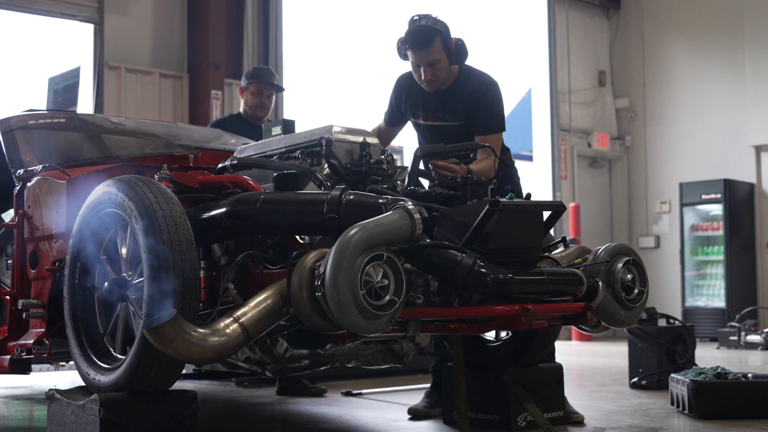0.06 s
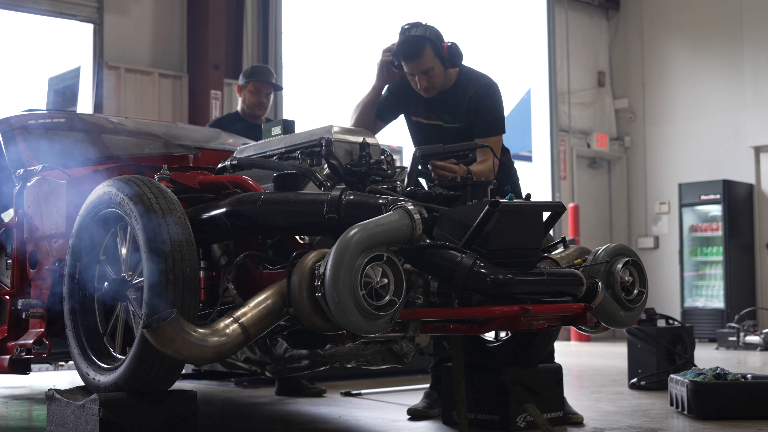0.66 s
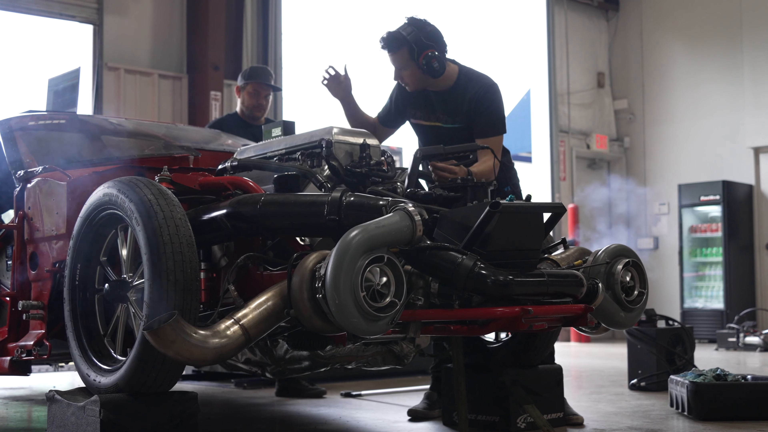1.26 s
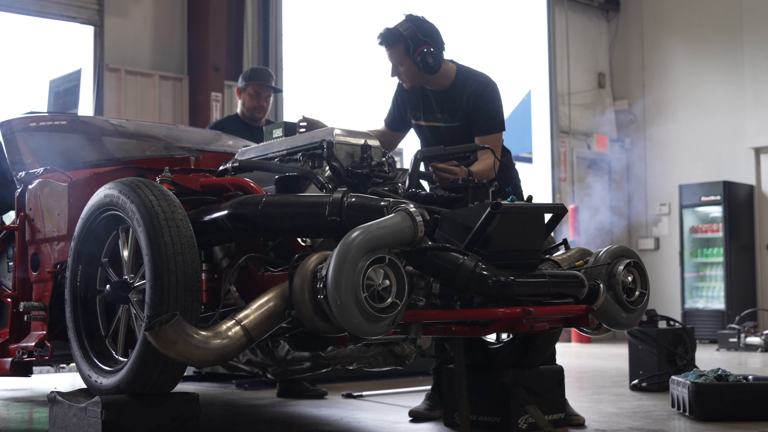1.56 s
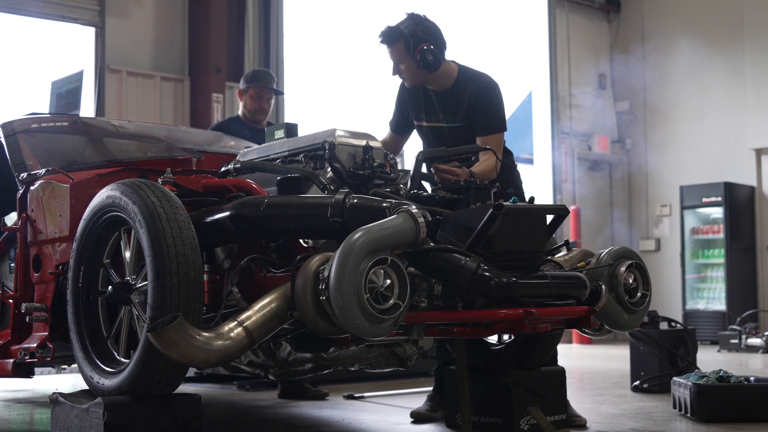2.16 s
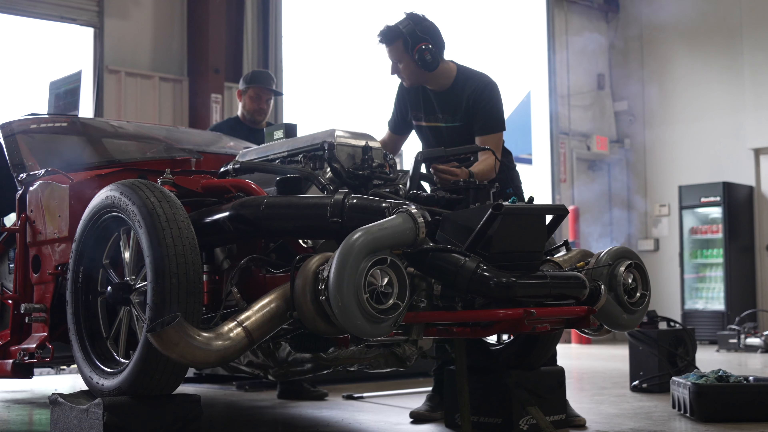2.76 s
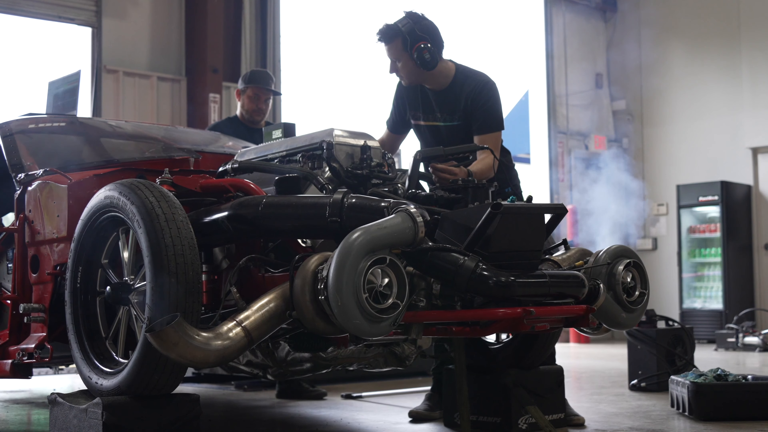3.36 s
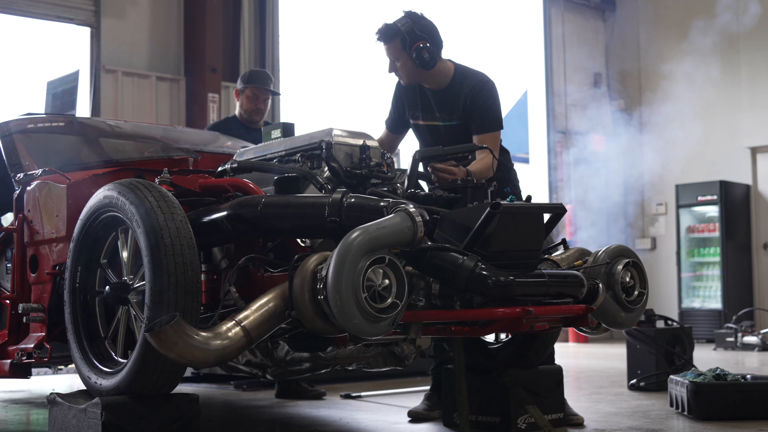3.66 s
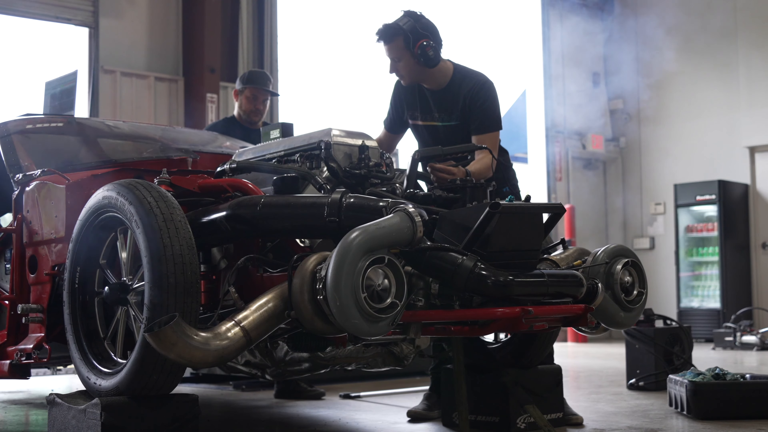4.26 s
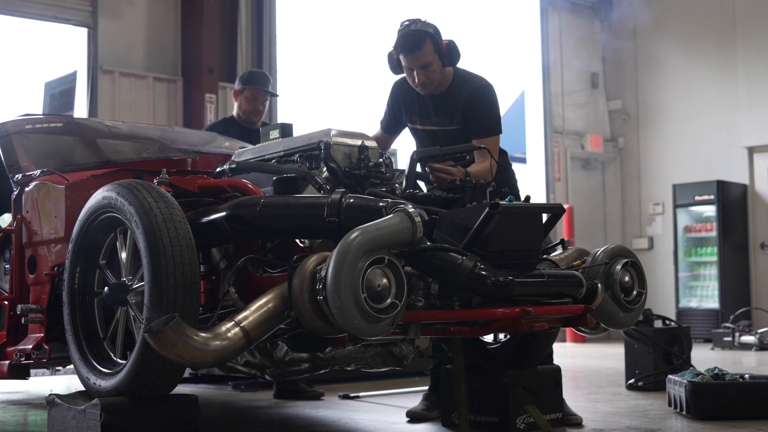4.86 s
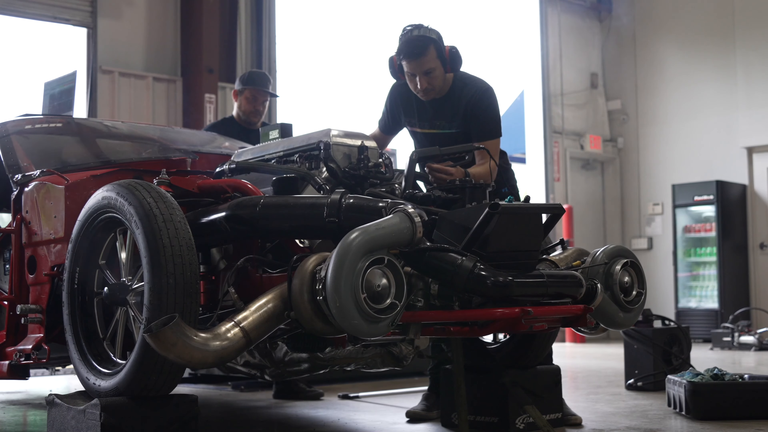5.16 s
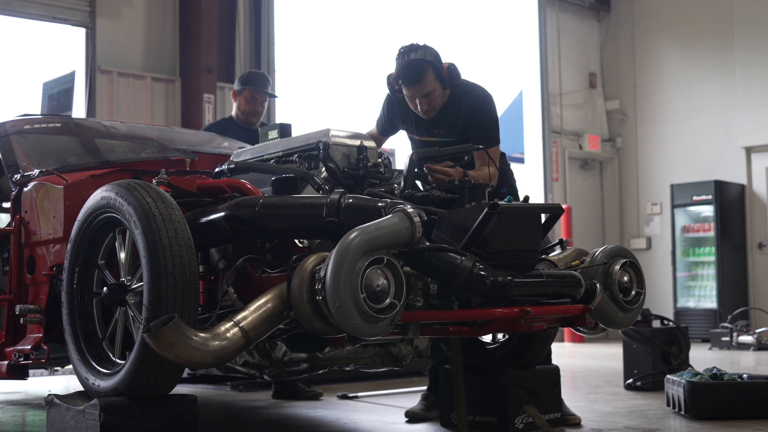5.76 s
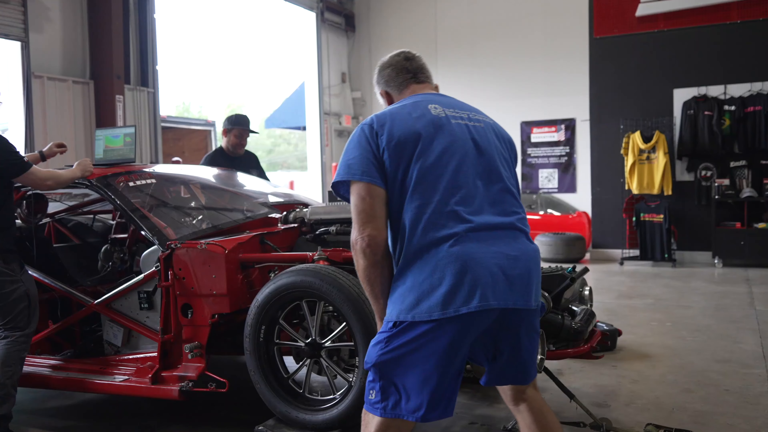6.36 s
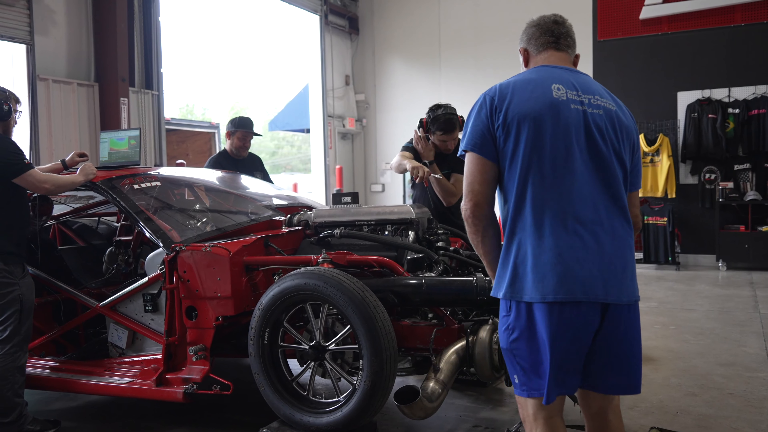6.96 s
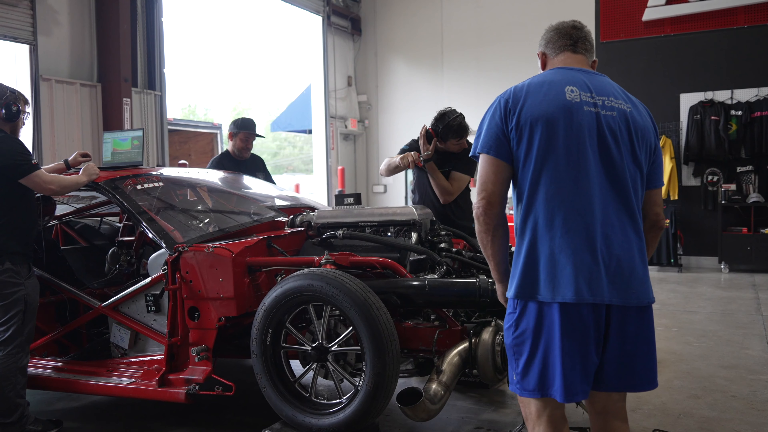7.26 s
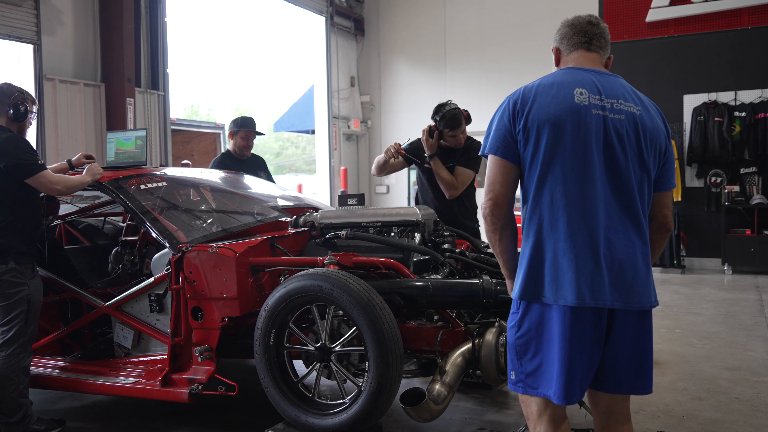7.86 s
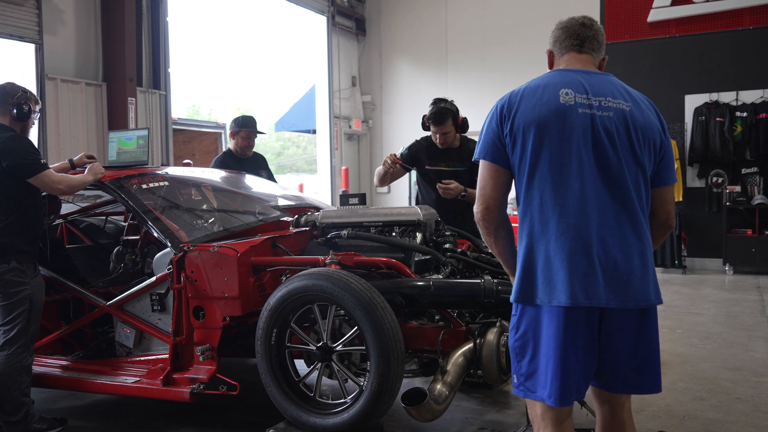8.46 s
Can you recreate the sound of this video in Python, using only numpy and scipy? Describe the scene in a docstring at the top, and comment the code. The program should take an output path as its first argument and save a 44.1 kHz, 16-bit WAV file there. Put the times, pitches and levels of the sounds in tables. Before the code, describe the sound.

A big race car engine cranks and coughs in a workshop, catches into a short crackling run, dies, then cranks and catches again.

```python
"""A workshop: a big turbocharged V8 with open pipes is started. Heard from the front, it cranks, coughs,
catches into a short, lumpy, crackling run and dies away. Then, abruptly from the side, it cranks with
small squeaks, bangs a few times and catches again. Starter gears grind and valves rattle with the
crankshaft; firings ring the pipes and spit gas, and the hard ones crack, thump and whistle."""
import sys
import numpy as np
from scipy import signal
from scipy.fft import rfft, irfft, next_fast_len
from scipy.io import wavfile
from scipy.ndimage import uniform_filter1d, map_coordinates

SR = 44100
rng = np.random.default_rng(int(sys.argv[2]) if len(sys.argv) > 2 else 0)


def wrap_up_sound(samples):
    """Save the sound to the file named by the first command line argument, as 16-bit audio."""
    columns = np.atleast_2d(samples).T
    # keep every value between -1 and 1, then stretch to whole-number steps
    tamed = np.clip(columns, -1, 1)
    steps = np.round(tamed * 32767).astype(np.int16)
    wavfile.write(sys.argv[1], SR, steps)


N = 384552
SIDE_FROM_S = 6.381  # the listener's place changes from front to side
FIRINGS_PER_TURN = 4
CRANKING_RPS, FULL_RPS = 4.5, 18  # rps: crankshaft turns per second


def amp(db):
    """Decibels to gain."""
    return 10 ** (np.asarray(db) / 20)


def unit(x):
    """Scale to rms 1."""
    return x / np.sqrt(np.mean(x ** 2) + 1e-20)


def clock():
    """Sample times in seconds."""
    return np.arange(N) / SR


def ramp(start_s, length_s):
    """Linear rise from 0 to 1."""
    return np.clip((clock() - start_s) / length_s, 0, 1)


def decay(t, t60_s, attack_s=None):
    """Exponential fall, with an optional soft onset."""
    return amp(-60 * t / t60_s) * (1 - np.exp(-t / attack_s) if attack_s else 1)


def by_place(front, side):
    """Switch with the listener's place."""
    return np.where(clock() < SIDE_FROM_S, front, side)


def along(points, hz):
    """Interpolate (Hz, value) points on a log axis."""
    knots_hz, values = np.transpose(points)
    return np.interp(np.log(hz + 1), np.log(knots_hz + 1), values)


def wobble(rate_hz):
    """Smooth random curve."""
    return map_coordinates(rng.standard_normal(int(N * rate_hz / SR) + 4), [clock() * rate_hz])


def filtered(x, response):
    """Apply a frequency response."""
    size = next_fast_len(N + SR // 2)
    return irfft(rfft(x, size) * response(np.fft.rfftfreq(size, 1 / SR)), size)[:N]


def noise(spectrum):
    """Coloured noise, rms 1."""
    return unit(filtered(rng.standard_normal(N), lambda hz: amp(along(spectrum, hz))))


def ring(x, spectrum, size=8192):
    """Drive a minimum-phase resonator of energy 1."""
    cepstrum = irfft(np.log(amp(along(spectrum, np.fft.rfftfreq(size, 1 / SR))) + 1e-4))
    cepstrum[1:size // 2] *= 2
    cepstrum[size // 2 + 1:] = 0
    response = irfft(np.exp(rfft(cepstrum)))
    return signal.fftconvolve(x, response / np.linalg.norm(response))[:N]


def add(track, start_s, sound):
    """Mix a sound into the track."""
    start = int(np.clip(round(start_s * SR), 0, N - 1))
    track[start:start + len(sound)] += sound[:N - start]


def breathy(hz, t, blur):
    """Tone blurred by random phase drift."""
    drift = np.cumsum(uniform_filter1d(rng.normal(0, blur, len(t)), size=24))
    return np.sin(2 * np.pi * hz * t + drift)


def harsh(hz, t, spread, count=14):
    """Close tones beating in a rough band, as strong as one sine."""
    detune, phase = rng.random((2, count, 1))
    pitches = hz * (1 + spread * (2 * (np.arange(count)[:, None] + detune) / count - 1))
    return np.sin(2 * np.pi * (pitches * t + phase)).sum(0) / np.sqrt(count)


def strokes(turns, sharpness):
    """A puff envelope on each piston stroke, rms 1."""
    return unit(np.exp(-sharpness * (FIRINGS_PER_TURN * turns % 1)))


def shell(modes):
    """Uneven clatter rings the modes of a metal shell, rms 1."""
    def response(f):
        return sum((-1) ** k * amp(db) * 1j * f * width / (hz * hz - f * f + 1j * f * width)
                   for k, (hz, width, db) in enumerate(modes))
    clatter = rng.standard_normal(N) * np.exp(0.39 * wobble(900))
    return unit(filtered(clatter, response))


def linger(envelope, t60_s):
    """Envelope of the diffuse echo that a noise leaves in the workshop."""
    keep = amp(-120 / (t60_s * SR))
    return np.sqrt(signal.lfilter([1 - keep], [1, -keep], envelope ** 2))


# Workshop reverberation. Each row: frequency in Hz, t60 in seconds.
WORKSHOP_T60_S = [(60, 0.22), (135, 0.58), (300, 0.55), (1000, 0.15), (4000, 0.54), (9000, 0.14),
                  (16000, 0.045)]

def workshop(x, wet_db, tails=1):
    """Room echo, each frequency dying at its own rate; several tails take turns of 0.2 s."""
    wet = np.zeros(N)
    active = np.arange(N) // (SR // 5) % tails
    for k in range(tails):
        hz, t, bands = signal.stft(rng.standard_normal(SR), SR, nperseg=1024)
        tail = signal.istft(bands * decay(t, along(WORKSHOP_T60_S, hz)[:, None]), SR, nperseg=1024)[1]
        tail *= 1 - np.exp(-np.arange(len(tail)) / SR / 0.00093)
        share = 1 if tails == 1 else uniform_filter1d(1. * (active == k), size=1024)
        wet += signal.fftconvolve(x * share, tail / np.linalg.norm(tail))[:N]
    return (x + amp(wet_db) * wet) / np.hypot(1, amp(wet_db))


# Gear hums. Each row: start and length in seconds, first and last pitch in Hz, level in dB.
GEAR_HUMS = [(.4, 0.32, 1030, 772, -48.5), (2.39, 0.2, 900, 807, -46.5), (6.39, 0.344, 1047, 1000, -48)]

def gear_hum():
    """The starter's gear mesh hums, sinking under load."""
    hz, gain = np.zeros((2, N))
    for start_s, length_s, first_hz, last_hz, db in GEAR_HUMS:
        progress = ramp(start_s, length_s)
        hz = np.where(progress > 0, first_hz + (last_hz - first_hz) * progress, hz)
        gain += amp(db) * np.sqrt(np.abs(np.sin(np.pi * progress)))
    gain *= amp(4.1 * wobble(45))
    hz *= 1 + 0.089 * wobble(400)
    return gain * np.sin(2 * np.pi * np.cumsum(hz) / SR)


# Drive squeaks and thin chirps. Each row: start in seconds, relative level in dB, pitch in Hz.
DRIVE_SQUEAKS = [(6.967, -29.5, 1390), (7.024, -28.5, 1334), (7.085, -33, 1300), (7.147, -33, 1355),
                 (7.211, -34.5, 1196), (7.291, -34, 1150), (7.803, -36, 915), (7.855, -36, 1240),
                 (7.908, -30, 1470), (8.046, -38, 1184), (8.099, -30, 1437)]
DRIVE_CHIRPS = [(.748, -49, 6950), (.798, -49, 6900), (.855, -41, 6500), (.872, -41, 6250),
                (6.966, -39, 6560), (7.022, -39, 6300), (7.088, -38, 6200), (7.145, -38, 5900),
                (7.21, -41, 6000), (7.28, -40.5, 5860), (7.908, -42, 6830), (8.098, -39, 6850),
                (8.17, -36, 6900)]

def squeaks(length_s=0.0272, sag=0.115):
    """The drive squeaks and chirps under compression load, each note sagging in pitch."""
    out, t = np.zeros(N), np.arange(int(length_s * SR)) / SR
    sagging = t * (1 + sag * (1 - t / length_s) / 2)
    window = np.hanning(len(t))
    for start_s, db, hz in DRIVE_SQUEAKS:
        rasp = amp(-11) * breathy(1.2 * hz, sagging, blur=0.18)
        rasp += amp(-12) * breathy(2.2 * hz, sagging, blur=0.15)
        add(out, start_s, amp(db - 3.5) * window * (breathy(hz, sagging, blur=0.04) + rasp))
    for start_s, db, hz in DRIVE_CHIRPS:
        add(out, start_s, amp(db - 1.5) * window * harsh(hz, sagging, spread=0.06))
    return out


def grinding(x, rps, depth_db=3.5):
    """Slow teeth meet unevenly, so low bands flare and fade; at speed they blend."""
    hz, _, bands = signal.stft(x, SR, nperseg=1024)
    field = uniform_filter1d(rng.standard_normal(bands.shape), size=4, axis=0)
    field = unit(uniform_filter1d(field, size=4, axis=1))
    flare = amp(depth_db * along([(1200, 1), (2600, .25)], hz)[:, None] * field)
    flare /= np.sqrt(np.mean(flare ** 2, axis=1, keepdims=True))
    uneven = unit(signal.istft(bands * flare, nperseg=1024)[1][:N])
    return x + np.interp(rps, [5.5, 9], [1, 0]) * (uneven - x)


# Starter gear spectra. Each row: frequency in Hz, level in dB.
GEARS_FRONT_DB = [(120, -40), (200, -4.5), (538, -6), (601, -7.5), (683, -5.5), (791, -4.5), (1040, -16),
                  (1250, -1), (1680, -6.5), (1810, -1.5), (3370, -3.5), (4120, -3.5), (6640, -11.5),
                  (13300, -21), (16000, -34)]
GEARS_SIDE_DB = [(120, -57), (200, -15.5), (465, -16.5), (519, -10.5), (916, -13.5), (1370, -9.5),
                 (1810, -18), (1910, -9), (2090, -15.5), (2750, -9), (4040, -16.5), (6050, -14.5),
                 (8270, -23), (13300, -29), (16000, -39)]
# Casing modes. Each row: frequency in Hz, width in Hz, level in dB.
CASING_FRONT_MODES = [(942, 71, 5), (1228.5, 19, 12.5), (2795, 130, 3), (3355, 114, 6.5), (7000, 280, -3.5),
                      (9940, 300, -5.5)]
CASING_SIDE_MODES = [(960, 140, 2.5), (1393, 10.6, 7), (2814, 55, 11), (3150, 90, 0.5), (3385, 41, 8.5),
                     (7100, 230, -0.5), (9900, 200, -8)]

def starter(rps, turns, first_engaged, db_per_rps=0.63):
    """Gears grind and ring their casing; from the side, single teeth clink."""
    chatter = strokes(turns, sharpness=0.11)
    clinks = unit(strokes(turns, sharpness=0.6) * amp(1.8 * wobble(45)))
    front = amp(-43) * grinding(noise(GEARS_FRONT_DB), rps)
    front += amp(-46.5) * chatter * grinding(shell(CASING_FRONT_MODES), rps)
    side = amp(-41.5) * grinding(noise(GEARS_SIDE_DB), rps)
    side += amp(-46.5) * clinks * shell(CASING_SIDE_MODES)
    spin_up = amp(-4 * (1 - ramp(SIDE_FROM_S, 0.82)))
    gears = by_place(np.sqrt(first_engaged) * front, spin_up * side)
    return amp(db_per_rps * (rps - CRANKING_RPS)) * gears


# Tappet and valve train spectra. Each row: frequency in Hz, level in dB.
TAPPET_DB = [(2000, -18), (5000, 2), (7500, 9), (10000, 0), (15800, -11)]
VALVE_RATTLE_DB = [(150, -20), (400, -16), (720, 1), (820, -11), (930, -4), (1100, -8.5), (1600, -8),
                   (2400, -1.5), (3000, -5), (4200, -7.5), (8000, -31), (13000, -52), (16000, -45)]

def valve_train(rps, turns, knee_rps=14.86):
    """Valves rattle and tappets tick, growing steeply with speed up to the knee."""
    taps = unit(strokes(turns, sharpness=0.46) * amp(3.5 * wobble(36)))
    ticks = amp(-14.5) * taps * noise(TAPPET_DB)
    gain = amp(-31.5) / np.hypot(1, (knee_rps / rps) ** 4.3)
    return gain * (noise(VALVE_RATTLE_DB) + ticks)


def pumping(turns, first_engaged):
    """Unfired cylinders push air softly through the pipes."""
    air = noise([(25, -4), (70, -29), (115, 4), (150, -10), (300, -15), (700, -47)])
    return amp(by_place(-58 + 8 * first_engaged, -54)) * strokes(turns, sharpness=1) * air


def machinery(rps, turns):
    """Starter and valves swell on each compression and flicker, over the pumped air."""
    first_engaged = 1 - ramp(3.6, 0.8)
    metal = starter(rps, turns, first_engaged) + valve_train(rps, turns)
    load_db = 0.4 * np.cos(2 * np.pi * FIRINGS_PER_TURN * turns) - 0.3
    flicker_db = 1.2 * wobble(110) + 0.8 * wobble(20)
    return amp(load_db + flicker_db) * metal + pumping(turns, first_engaged)


# Pipe gulps. Each row: start in seconds, relative level in dB, pitch in Hz.
PIPE_HOOTS = [(0.398, -42, 331), (0.411, -45.5, 264), (1.294, -34, 230)]

def hoots(length_s=0.067):
    """A pipe gulps with a hollow note."""
    out, t = np.zeros(N), np.arange(int(length_s * SR)) / SR
    for start_s, db, hz in PIPE_HOOTS:
        add(out, start_s, amp(db + 6) * np.hanning(len(t)) * breathy(hz, t, blur=0.033))
    return workshop(out, wet_db=-14)


# Gas whistles. Each row: start in seconds, relative level in dB, pitch in Hz, t60 in seconds,
# half width as a share of the pitch.
GAS_WHISTLES = [(0.084, -23.5, 4200, 0.047, 0.057), (0.3317, -26, 4440, 0.058, .06),
                (1.255, -26.5, 4380, 0.096, .07), (1.475, -30, 4380, .06, .06),
                (1.557, -27, 5150, 0.057, .05), (2.297, -25, 4480, 0.073, 0.077),
                (2.652, -18.5, 4300, 0.056, .07), (3.458, -27, 4340, 0.068, .05),
                (3.5167, -24, 5010, 0.055, .03), (3.581, -30, 4550, .06, .04), (3.672, -28, 5130, .04, .03),
                (3.7266, -27, 4670, 0.05, .03), (3.797, -17, 5400, 0.03, .03), (3.83, -21, 4930, .025, .02),
                (3.9113, -18.5, 5350, 0.026, 0.018), (3.955, -20.5, 5330, .02, .03),
                (4.015, -22, 5430, .02, .03), (4.104, -15.5, 5500, 0.018, .03),
                (4.211, -20.5, 5570, 0.033, .03), (4.384, -19, 5000, .02, .03),
                (7.3815, -14.5, 5880, 0.048, 0.023), (8.395, -16, 5500, 0.028, .03)]

def whistles():
    """After some firings gas whistles through a gap, harsh when cranking, purer as the engine catches."""
    out, t = np.zeros(N), np.arange(SR // 4) / SR
    for start_s, db, hz, t60_s, spread in GAS_WHISTLES:
        rasp = np.tanh(2.5 * harsh(hz, t, spread))
        add(out, start_s - .001, amp(db + 3.5) * decay(t, t60_s, attack_s=.001) * rasp)
    return workshop(out, wet_db=-5, tails=2)


# Runs. Each row: times in seconds of catch, all cylinders in, throttle eased and ignition off,
# then relative hiss level in dB.
ENGINE_RUNS = [(3.36, 4.12, 4.73, 5.61, -24.5), (8.29, 8.528, 9, 9.5, -20.5)]
# Hiss dips as cylinders miss, and one swell. Each row: start and length in seconds, change in dB.
HISS_SWINGS = [(3.846, 0.051, 8.5), (4.286, 0.16, -20), (5.563, .06, -7), (5.645, .05, -6)]

def run_levels(rps, boom_db_per_rps=1.35):
    """Boom follows speed, hiss the throttle; misses weaken the boom and both fade at ignition off."""
    t = clock()
    boom, hiss = np.zeros((2, N))
    for catch_s, all_in_s, eased_s, off_s, hiss_db in ENGINE_RUNS:
        missing = 1 - ramp(catch_s, all_in_s - catch_s) ** 3
        coast_db = -7 * ramp(off_s, 0.15) - 33.5 * np.maximum(t - off_s, 0)
        throttle_db = -9 * ramp(eased_s, 0.08) - 9.5 * np.maximum(t - eased_s, 0)
        alight = ramp(catch_s, 0.12) * amp(coast_db)
        boom += alight * amp(-14 + boom_db_per_rps * (rps - FULL_RPS) - 12.5 * missing)
        hiss += alight * amp(hiss_db + throttle_db + 2.5 * missing)
    for start_s, length_s, db in HISS_SWINGS:
        hiss *= amp(db * np.sin(np.pi * ramp(start_s, length_s)))
    return boom, hiss


# Pipe turbulence spectra. Each row: frequency in Hz, level in dB.
BARK_FRONT_DB = [(250, -25), (380, -4.5), (470, -4), (560, -4), (730, -9), (950, 12.5), (1080, -10),
                 (1300, 0), (1700, -8), (3000, -24)]
BARK_SIDE_DB = [(250, -16), (400, 4), (500, 2), (590, -2), (690, 2), (790, -6), (920, 8), (1040, 2),
                (1150, 5), (1350, -8.5), (1700, -13), (3000, -24)]

def bark(turns, boom):
    """Turbulence in the pipes pulses with the strokes."""
    turbulence = by_place(amp(-28.5) * noise(BARK_FRONT_DB), amp(-11.5) * noise(BARK_SIDE_DB))
    return uniform_filter1d(boom, size=SR // 8) * strokes(turns, sharpness=0.34) * turbulence


# Spectra of a gas burst and its lingering hiss. Each row: frequency in Hz, level in dB.
GAS_BURST_DB = [(300, 4.5), (700, -5), (1500, -3), (3000, -3.5), (5500, -0.5), (8500, 2.5), (12000, -2.5),
                (15800, -4)]
GAS_HISS_DB = [(500, -16), (1500, -21), (2900, 3.5), (4000, 2), (5400, 4), (7500, -3), (10000, -6),
               (13000, -13), (16000, -17)]
# Steel manifold modes. Each row: frequency in Hz, width in Hz, level in dB.
MANIFOLD_MODES = [(2780, 70, 0), (2925, 50, 1), (3350, 150, -1)]

def gas(spits, hiss, puff_s=0.009):
    """Each firing spits a puff of gas that lingers as hiss and rings the manifold."""
    puffs = hiss * unit(signal.lfilter([1], [1, -np.exp(-1 / (puff_s * SR))], spits))
    direct = amp(-19.5) * puffs * noise(GAS_BURST_DB)
    echo = amp(-9) * linger(puffs, t60_s=0.86) * noise(GAS_HISS_DB)
    steel = amp(-17) * linger(puffs, t60_s=0.4) * shell(MANIFOLD_MODES)
    return direct + echo + steel


# Exhaust pipe resonance. Each row: frequency in Hz, level in dB.
PIPE_DB = [(20, -66), (45, -39), (75, -26), (100, -15), (122, -7), (140, -2), (164, 1), (182, -3),
           (197, -9), (245, -5), (310, -12.5), (385, -8), (460, -11), (530, -27), (730, -26), (950, -26),
           (1080, -33), (1300, -32), (3000, -65)]
# Drone partials: multiples of the crank speed, and their levels in dB.
DRONE_ORDERS = [5, 7, 8, 9, 10, 11, 16, 21, 23]
DRONE_ORDER_DB = [7, -8, 0, 3, -5, 2, 0, -1, -2]

def pipes(pulses, boom, rps, turns):
    """Firings throb in the pipes; at speed a drone takes over, its orders swelling at resonance."""
    steady = np.interp(rps, [10, 15], [0, .72])
    throb = workshop(np.sqrt(1 - steady) * boom * ring(pulses, PIPE_DB), wet_db=-3, tails=3)
    gains = np.array([amp(db + along(PIPE_DB, k * rps)) for k, db in zip(DRONE_ORDERS, DRONE_ORDER_DB)])
    partials = [amp(wobble(5)) * np.sin(2 * np.pi * (k * turns + rng.random())) for k in DRONE_ORDERS]
    drone = np.sum(gains * partials, 0) / np.linalg.norm(gains, axis=0)
    return amp(-1.5) * throb + np.sqrt(steady) * uniform_filter1d(boom, size=SR // 8) * drone


# Cylinder strengths in dB, in firing order.
CYLINDER_DB = [3.5, -3.5, -5, 3.5, -5, -17, 0, -6.5]

def exhaust(rps, turns, far_bank_s=0.002595, jitter_s=0.00025, spit_scatter_db=5.7):
    """Eight uneven firings in two turns, one bank arriving late, drive the pipes and the gas."""
    boom, hiss = run_levels(rps)
    fired = np.flatnonzero(np.diff(np.floor(FIRINGS_PER_TURN * turns)))
    weakness_db, timing, spit_scatter = rng.standard_normal((len(fired), 3)).T
    force = unit(amp(np.resize(CYLINDER_DB, len(fired)) - weakness_db))
    first_off_s = ENGINE_RUNS[0][3]
    coasting = (fired / SR > first_off_s) & (fired / SR < SIDE_FROM_S)
    force[coasting] = 0.85  # ignition off: all cylinders pump alike
    delay_s = far_bank_s * np.resize([0, 1, 0, 1, 1, 0, 1, 0], len(fired)) + jitter_s * timing
    arrivals = np.clip(fired + (SR * delay_s).astype(int), 0, N - 1)
    pulses = np.bincount(arrivals, force * np.sqrt(SR / (FIRINGS_PER_TURN * rps[fired])), N)
    spits = np.bincount(arrivals, force * amp(spit_scatter_db * spit_scatter), N)
    return pipes(pulses, boom, rps, turns) + bark(turns, boom) + gas(spits, hiss)


# Coughs and backfires. Each row: time in seconds, relative crack level in dB, extra thump in dB.
HARD_FIRINGS = [(0.0802, -17.5, 0), (0.3316, -20.5, -1.5), (0.6542, -24.5, -2), (0.9394, -29, 0),
                (1.0159, -20.5, -1), (1.1046, -22, 1.5), (1.1762, -25.5, 7.5), (1.2491, -22, -3),
                (1.271, -19.5, -1), (1.3192, -23, -1), (1.4731, -23, -1.5), (1.5565, -21.5, -0.5),
                (1.724, -22.5, -2.5), (1.8195, -23.5, -5), (2.0114, -24, 1), (2.1053, -23.5, -2.5),
                (2.2971, -22, -3), (2.6513, -23.5, -6.5), (2.7652, -22.5, -1), (2.9648, -23.5, -2.5),
                (3.0638, -20.5, -6), (3.1517, -22.5, -2), (3.3186, -21.5, -5.5), (3.4166, -23.5, -1),
                (3.4576, -24.5, 6), (3.5176, -23.5, 6), (3.5794, -21, 3), (3.6712, -32, 7),
                (3.7251, -22, 7.5), (3.752, -26, -9), (3.7964, -23.5, 5), (3.839, -22, -2),
                (3.9097, -26, -3), (3.954, -20, 2), (3.9785, -18.5, 3), (4.015, -20, 3), (4.045, -21, 8.5),
                (4.0803, -17.5, 0), (4.1007, -16, -14), (4.132, -19, 6), (4.151, -17, 0),
                (4.211, -17.5, -1), (4.2409, -18, 0), (4.2594, -21, 5), (4.2883, -23, 7.5),
                (4.304, -22, -3), (4.3835, -15.5, 4), (4.401, -20, -4), (4.426, -19, 5.5), (4.442, -24, 1),
                (4.4659, -19.5, 5.5), (4.4894, -21, 4), (4.5135, -21, 4), (4.529, -20, 0), (4.5512, -24, 8),
                (4.566, -19, 2), (4.587, -32, 5.5), (4.6116, -22, 1), (4.632, -21, 3), (4.646, -24, -3),
                (4.6689, -19, 3), (4.683, -20.5, 3), (4.7446, -19, 8.5), (4.759, -21, 0), (4.78, -21, 1),
                (4.793, -22, 3), (4.813, -25, -6), (4.834, -24, -5), (4.8534, -19, 5), (4.867, -20, -4),
                (4.9004, -24, -4), (4.921, -24, -6), (4.9623, -19, -2), (4.977, -22, -7), (5.0331, -22, -5),
                (5.0764, -15.5, 2), (5.089, -21, -3), (5.1284, -24.5, 8), (5.151, -26, -12),
                (5.1982, -17.5, 0), (5.2541, -22.5, -2), (5.2781, -21, 2), (5.328, -24, 3),
                (5.3878, -22, 3), (5.396, -20, 4), (5.412, -21.5, 4.5), (5.455, -27.5, -4), (5.463, -23, 9),
                (5.5345, -21, -8), (5.5534, -22, -2), (5.612, -28, -1), (5.6303, -23, 0),
                (5.694, -25.5, 11.5), (5.805, -51, 11), (6.712, -14, -7.5), (7.3818, -14.5, -1.5),
                (7.6203, -19, -3.5), (7.9753, -33, 4), (8.1772, -28, -14), (8.2855, -15, -0.5),
                (8.3951, -19, 5), (8.445, -19.5, -0.5), (8.471, -14.5, 4.5), (8.5388, -16.5, 3.5),
                (8.5578, -10.5, 3.5), (8.6271, -12, 2.5), (8.6765, -17, 5), (8.7, -12, 0)]
# Spectra of the thin crack at speed and of the wall echo. Each row: frequency in Hz, level in dB.
CRACK_FAST_DB = [(300, -12), (1500, -11), (3500, 5.5), (5500, -1.5), (7000, 6), (9000, 5), (12000, 1),
                 (15800, 4.5)]
CRACK_ECHO_DB = [(300, 4), (700, 0), (1500, 1.5), (3000, 7), (5500, 8), (8500, 2), (12000, -2), (15800, -9)]

def cracks(rps, lead_s=0.042, ping_hz=5500):
    """Gas leaks ahead of a hard firing, then cracks; at speed it is drier and pings the pipe's mouth."""
    envelope, pings, knocks = np.zeros((3, N))
    t = np.arange(SR // 4) / SR
    fast = np.interp(rps, [7, 13], [0, 1])
    for start_s, db, _ in HARD_FIRINGS:
        now_rps = rps[int(start_s * SR)]
        attack_s = np.interp(now_rps, [7, 13], [.002, .001])
        t60_s = np.interp(now_rps, [7, 13], [.031, .023])
        leak = amp(db - 15 - 1.2 * now_rps) * np.linspace(0, 1, int(lead_s * SR))
        ping = breathy(ping_hz * np.exp(.06 * rng.normal()), t, blur=.12)
        add(envelope, start_s - lead_s, leak)
        add(envelope, start_s - .001, amp(db) * decay(t, t60_s, attack_s))
        add(knocks, start_s - .002, amp(db - 12) * decay(t, t60_s=0.05))
        add(pings, start_s, amp(db - 8) * decay(t, t60_s=0.028) * ping)
    burst = np.sqrt(1 - fast) * noise(GAS_BURST_DB) + np.sqrt(fast) * noise(CRACK_FAST_DB)
    ringing = fast * (pings + hollow_ring(knocks))
    echo = amp(7 - .5 * rps) * linger(envelope, t60_s=0.72) * noise(CRACK_ECHO_DB)
    return amp(2) * envelope * burst + ringing + echo


# Upper pipe modes. Each row: frequency in Hz, width in Hz, level in dB.
HOLLOW_MODES = [(420, 41, 3.5), (635, 39, 1), (724, 26, 1.5), (952, 47, 0), (1210, 52, -0.5),
                (1460, 60, -4)]

def hollow_ring(knocks):
    """Cracks ring the pipes' hollow upper notes."""
    return np.hypot(knocks, amp(1) * linger(knocks, t60_s=0.31)) * shell(HOLLOW_MODES)


# Spectra of a single cough. Each row: frequency in Hz, level in dB.
COUGH_FRONT_DB = [(20, -68), (45, -19), (80, -4.5), (115, -5.5), (150, -6.5), (190, -6), (240, -8.5),
                  (300, -18), (390, -7.5), (520, -28), (950, -29), (2000, -37)]
COUGH_SIDE_DB = [(20, -40), (45, -13), (80, 2), (115, -6), (148, 6.5), (200, -7), (300, -18), (400, -15.5),
                 (560, -26), (950, -12.5), (2000, -68)]

def thumps(rps, pipe_hz=146):
    """Hard firings shove air from the pipe, whose lowest note rings on; a running engine's boom surges."""
    pushes, swirl, notes, surges = np.zeros((4, N))
    t = np.arange(SR // 2) / SR
    boom, _ = run_levels(rps)
    for start_s, crack_db, extra_db in HARD_FIRINGS:
        at = int(start_s * SR)
        shove = amp(crack_db + extra_db - 14.5)
        surge = boom[at] * amp(extra_db - 7.5)
        add(pushes, start_s - .003, [shove * amp(25)])
        add(surges, start_s - .003, [surge * amp(27)])
        add(swirl, start_s - .009, shove * amp(4.5) * decay(t, t60_s=0.081))
        pop = np.sin(2 * np.pi * pipe_hz * np.exp(.1 * rng.normal()) * t)  # the first hard swings
        add(notes, start_s - .007, shove * amp(17) * decay(t, t60_s=0.07, attack_s=.006) * pop)
        note = breathy(pipe_hz * np.exp(0.0843 * rng.normal()), t, blur=0.036)
        note_gain = (shove + surge) * amp(10 - 0.5229 * rps[at])
        add(notes, start_s - .01, note_gain * decay(t, t60_s=0.34, attack_s=.015) * note)
    blows = pushes + swirl * rng.standard_normal(N)
    side_gain = amp(2 - 0.9 * (rps - CRANKING_RPS))
    coughs = by_place(ring(blows, COUGH_FRONT_DB), side_gain * ring(blows, COUGH_SIDE_DB))
    throbs = workshop(ring(surges, PIPE_DB), wet_db=-7, tails=2)
    return workshop(coughs, wet_db=-1.5, tails=3) + throbs + notes


# Crankshaft speed in each start. Each row: time in seconds, turns per second.
FIRST_START_RPS = [(0, 4.5), (.9, 4), (1.3, 6.5), (2.55, 4.2), (3.3, 7.5), (3.7, 11.8), (4.2, 14.4),
                   (4.75, 18.2), (4.87, 18.4), (5, 17.8), (5.3, 15.1), (5.6, 13.7), (5.8, 12), (6.37, 6.5)]
SECOND_START_RPS = [(6.39, 3.6), (7, 4.1), (7.3, 3.4), (7.5, 4.8), (8.15, 4), (8.4, 9.5), (8.72, 14)]
# Colour of reflections off the metal around the engine. Each row: frequency in Hz, gain in dB.
BODYWORK_DB = [(2000, 0), (2750, 0.5), (3050, -0.5), (3350, 0.5), (3800, -2), (4600, 0.5), (5600, 0),
               (6500, -2), (7200, 1.5), (7900, 0), (8500, -0.5), (9300, 1.5), (9900, 0.5), (10400, -2),
               (10800, 0), (11700, 0.5), (12300, -4), (13100, 3), (13800, -2), (14700, -0.5), (15900, -8)]

def scene():
    """Two starts: crankshaft-driven layers and timed events, coloured by the bodywork."""
    rps = np.interp(clock(), *np.transpose(FIRST_START_RPS + SECOND_START_RPS))
    turns = np.cumsum(rps) / SR
    engine = exhaust(rps, turns) + machinery(rps, turns)
    engine += workshop(squeaks() + gear_hum(), wet_db=-12)
    engine += whistles() + hoots() + cracks(rps) + thumps(rps)
    return filtered(engine, lambda hz: amp(along(BODYWORK_DB, hz)))[None]


def record(dry, low_hz=44, top_hz=15950):
    """Thin the deepest bass and cut the highest treble."""
    return filtered(dry[0], lambda hz: (hz < top_hz) * hz ** 3 / np.hypot(hz ** 3, low_hz ** 3))[None]


dry = scene()
out = record(dry)
wrap_up_sound(out)
```